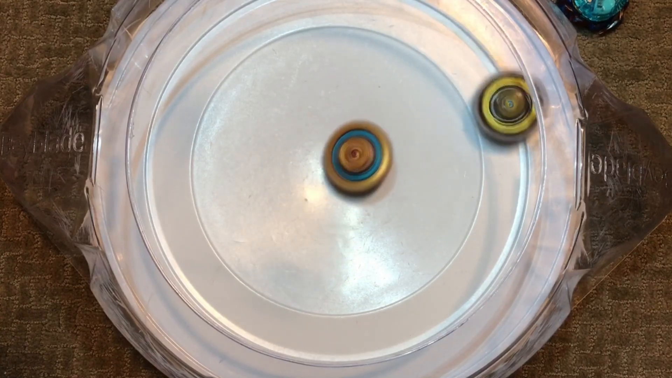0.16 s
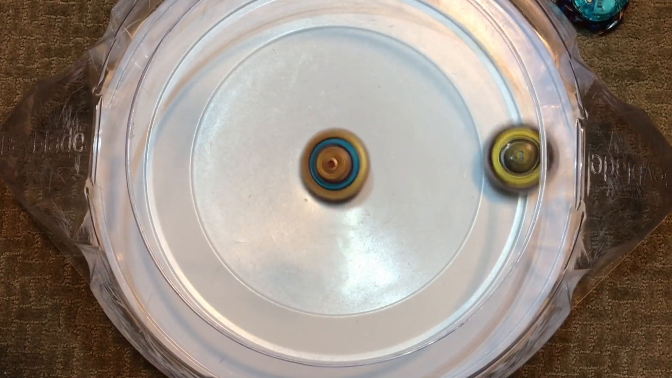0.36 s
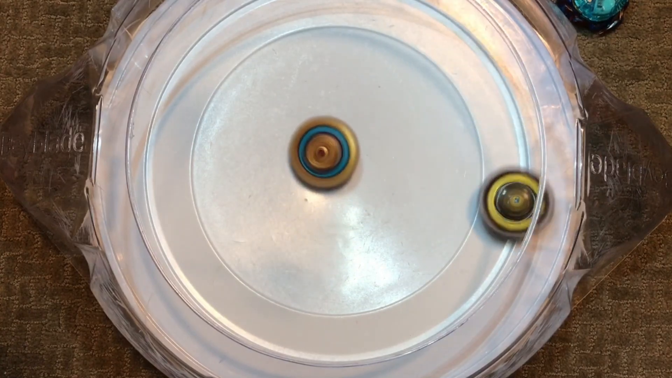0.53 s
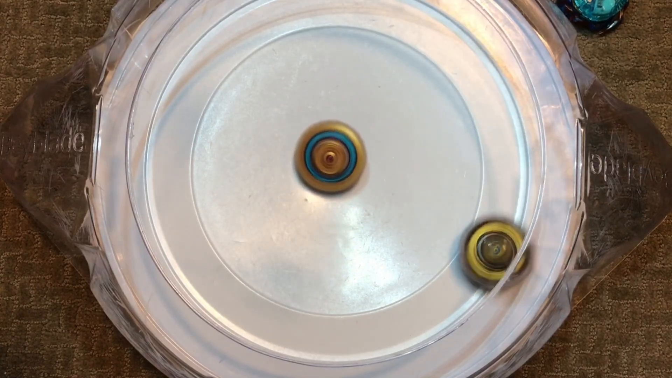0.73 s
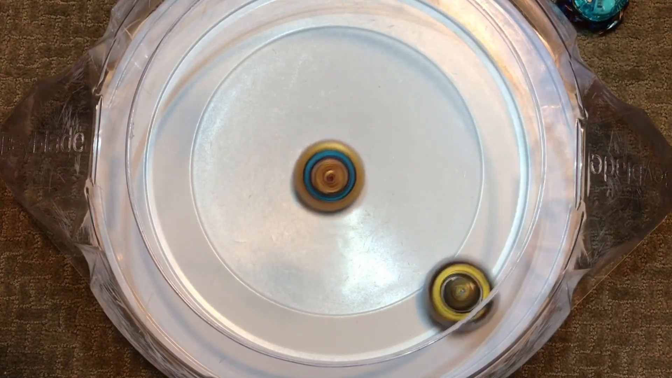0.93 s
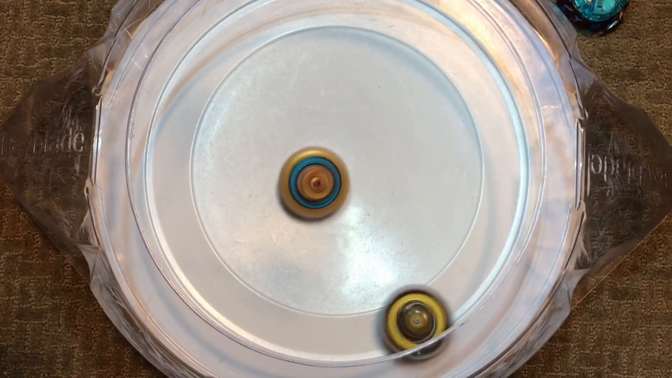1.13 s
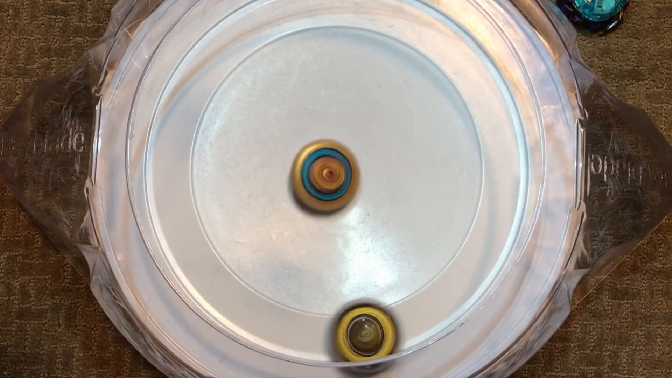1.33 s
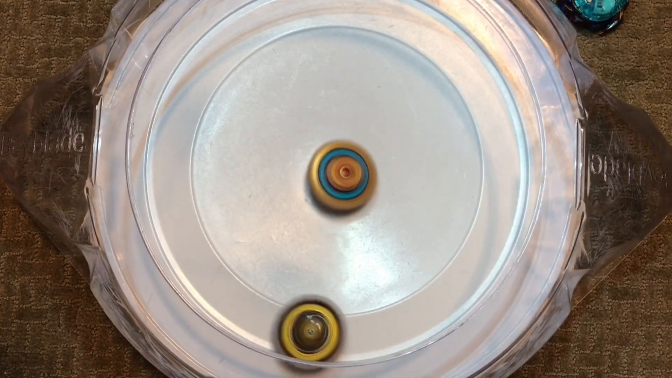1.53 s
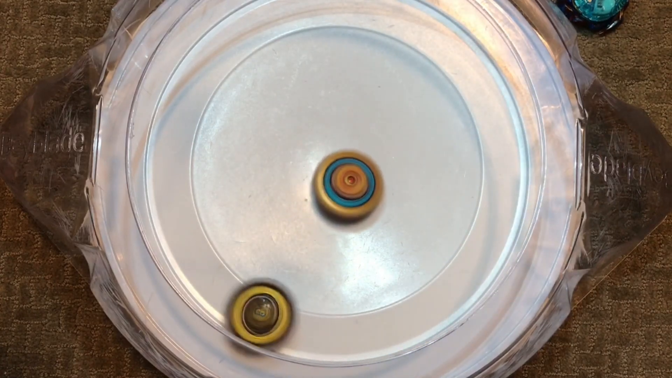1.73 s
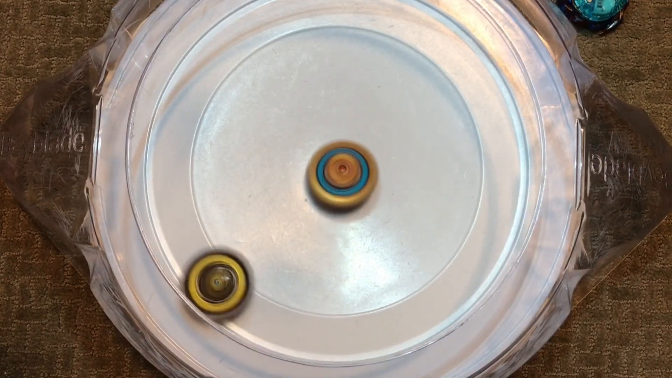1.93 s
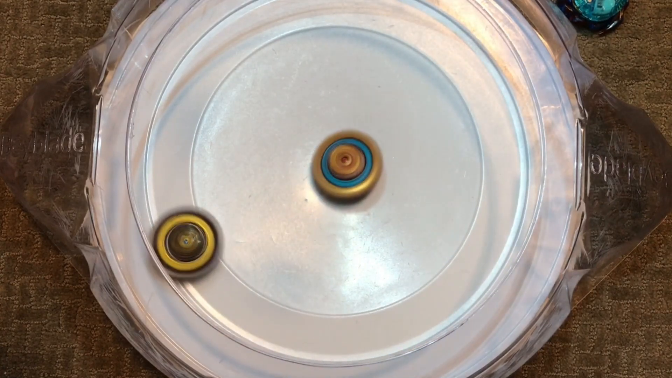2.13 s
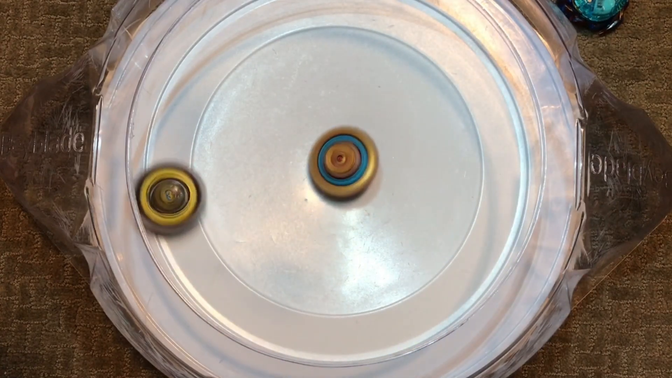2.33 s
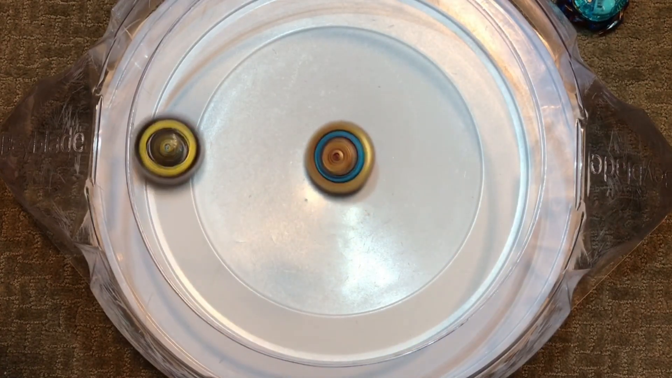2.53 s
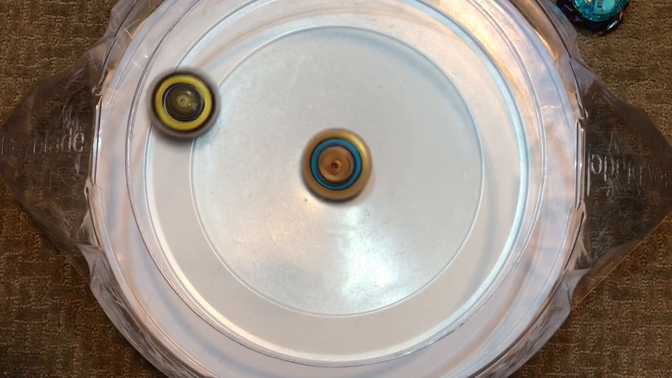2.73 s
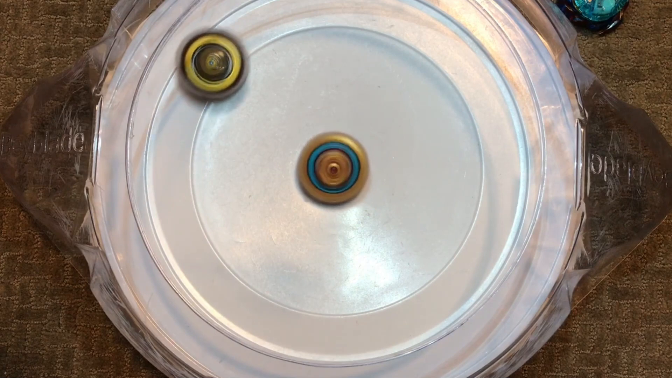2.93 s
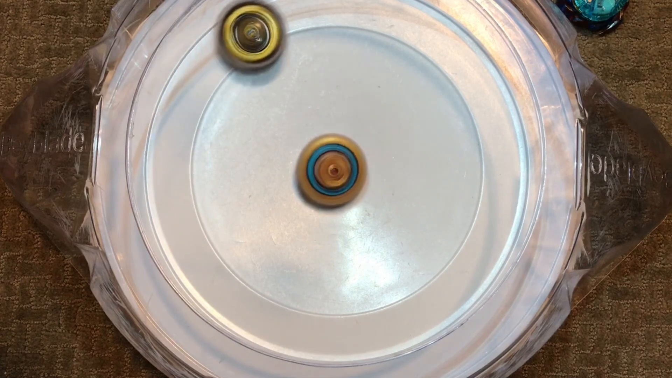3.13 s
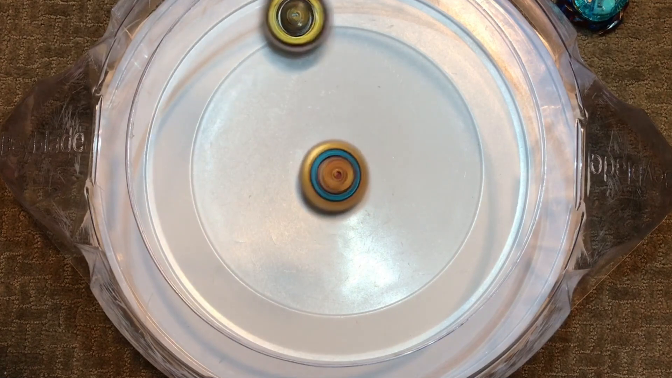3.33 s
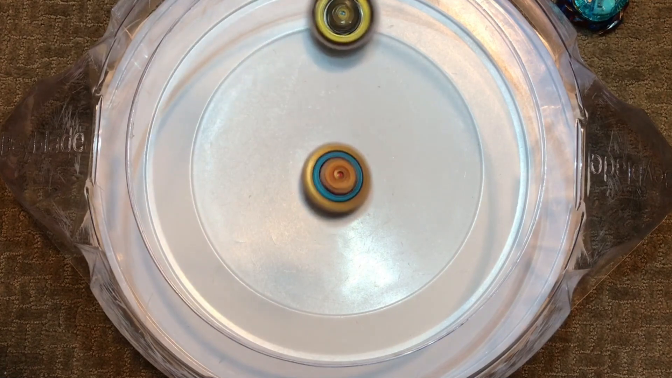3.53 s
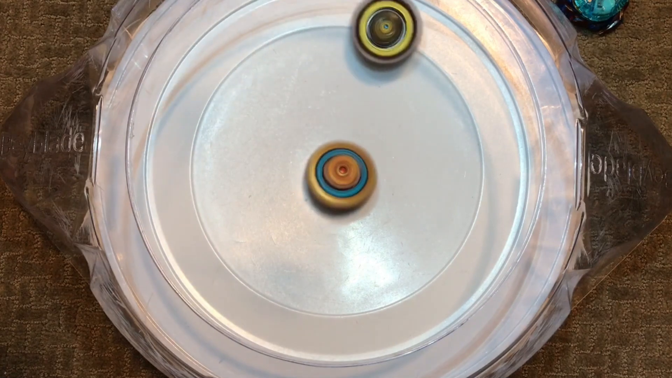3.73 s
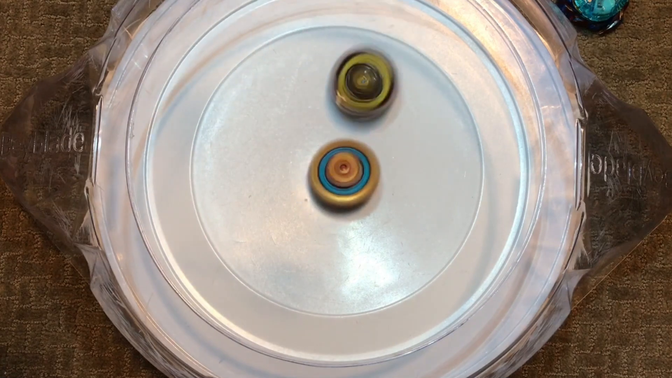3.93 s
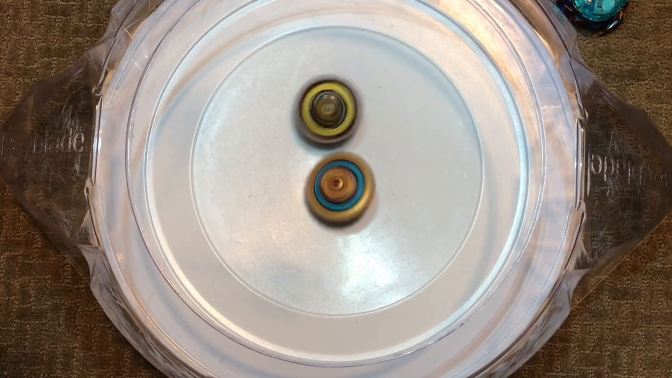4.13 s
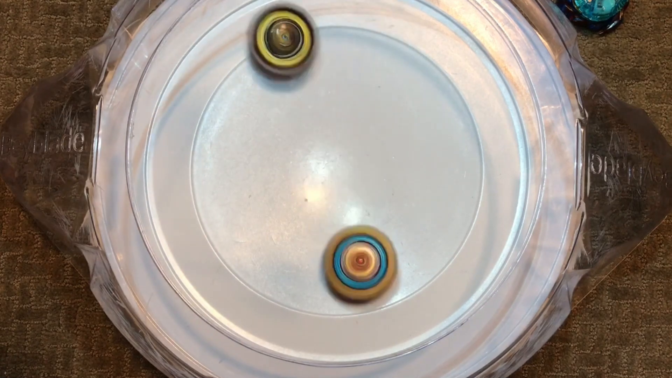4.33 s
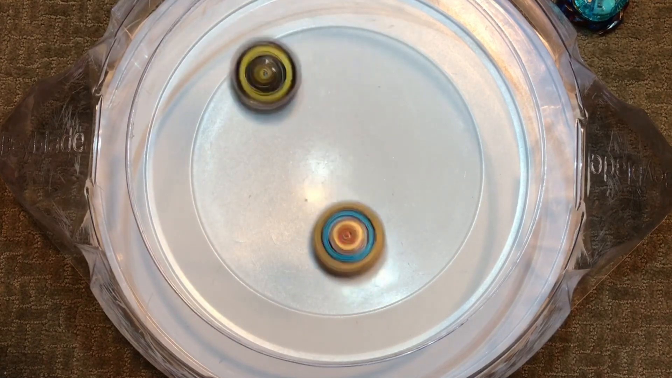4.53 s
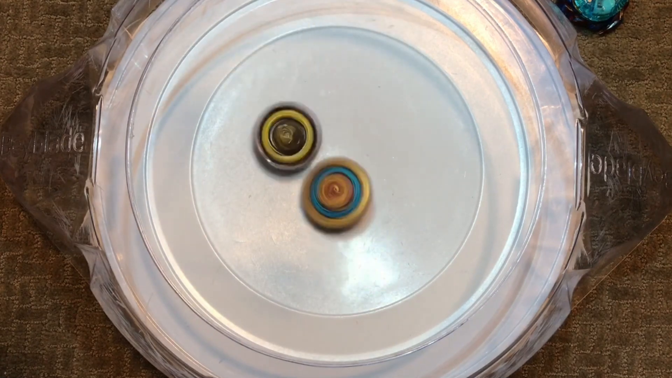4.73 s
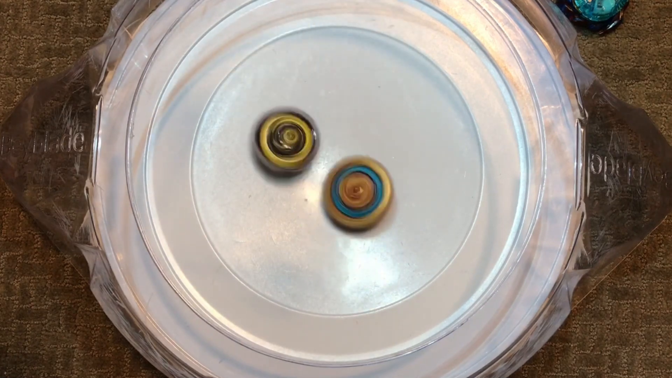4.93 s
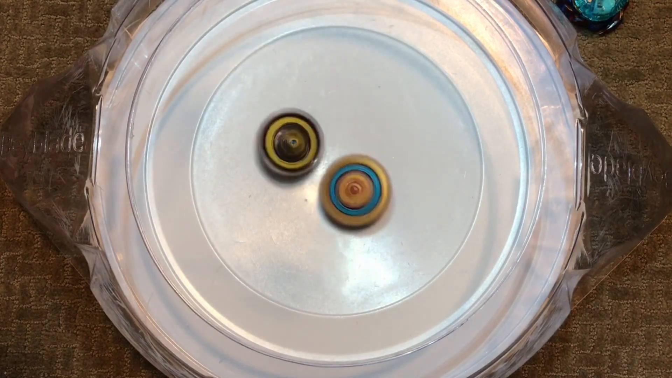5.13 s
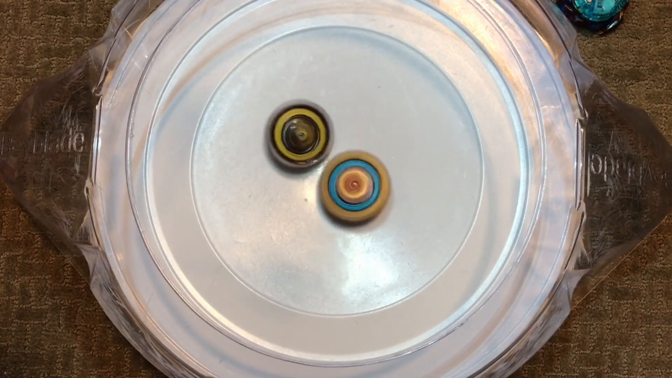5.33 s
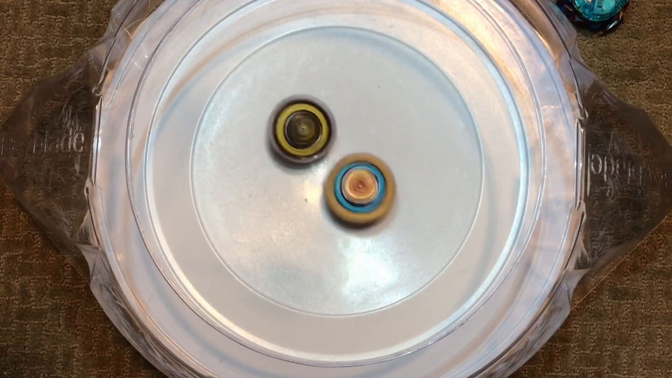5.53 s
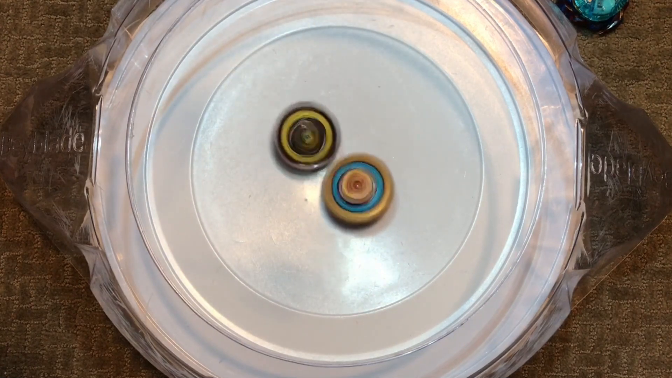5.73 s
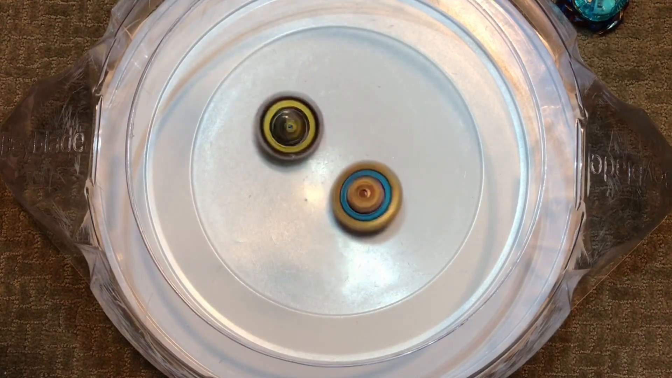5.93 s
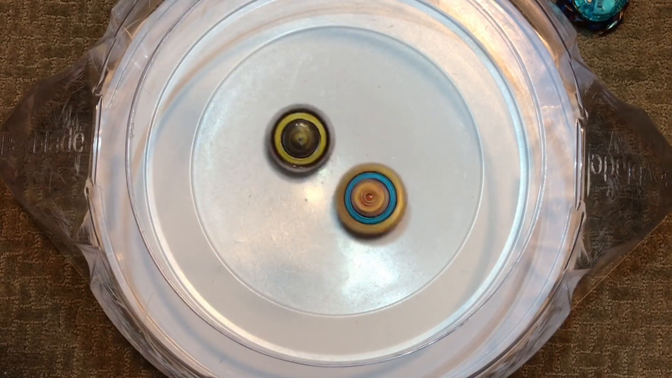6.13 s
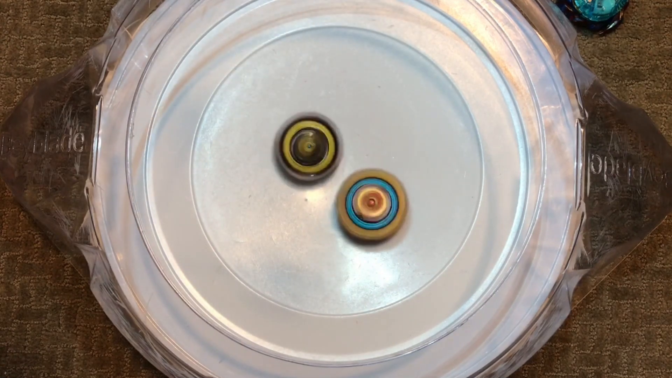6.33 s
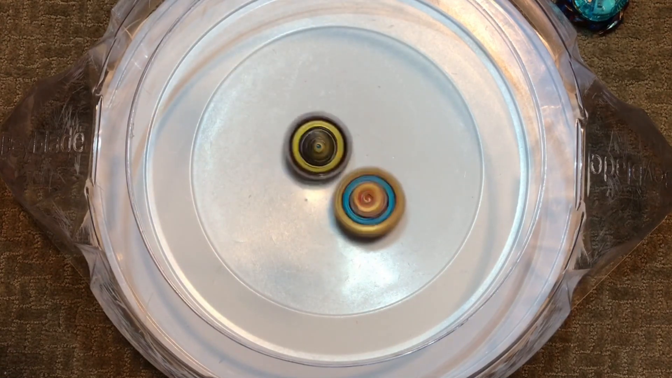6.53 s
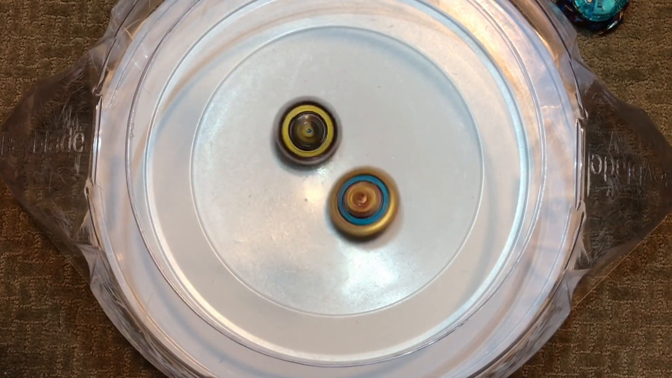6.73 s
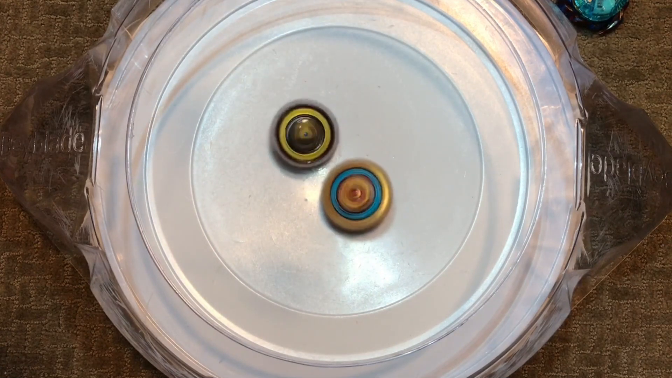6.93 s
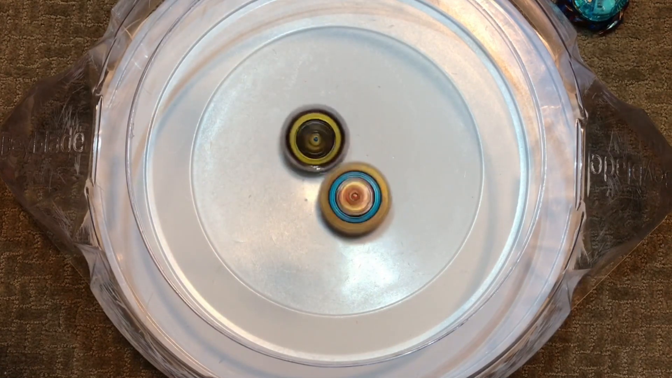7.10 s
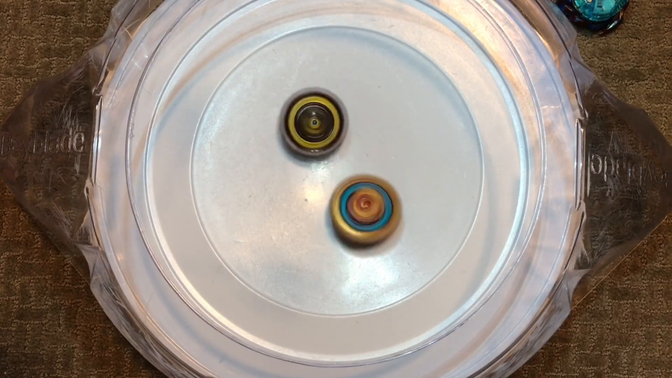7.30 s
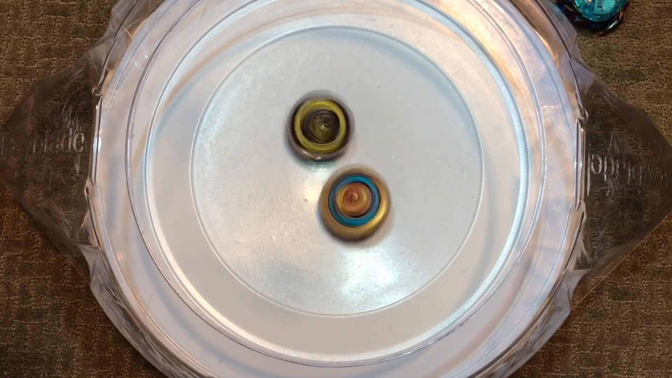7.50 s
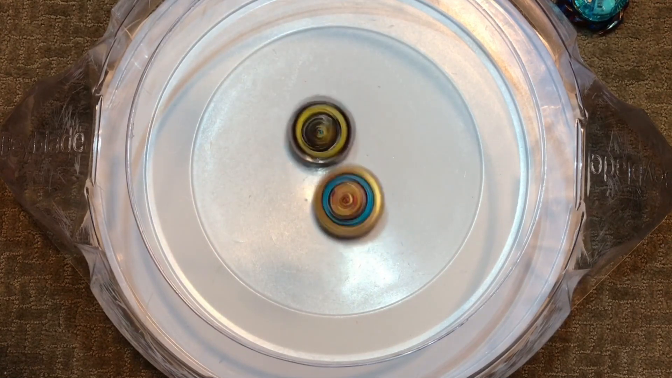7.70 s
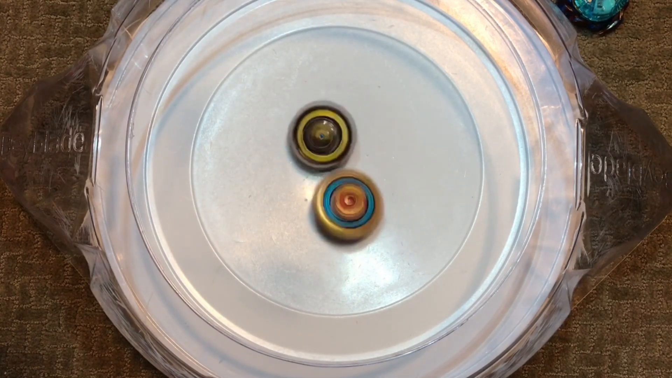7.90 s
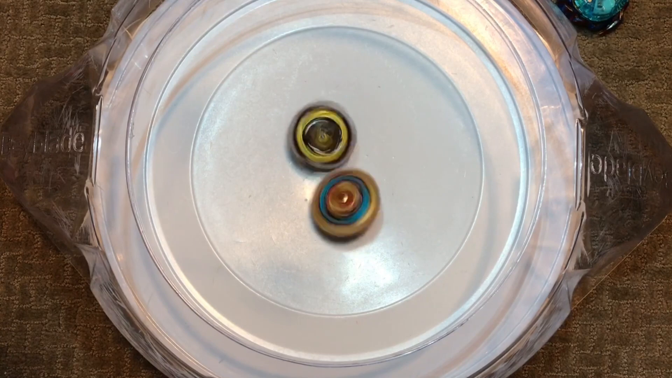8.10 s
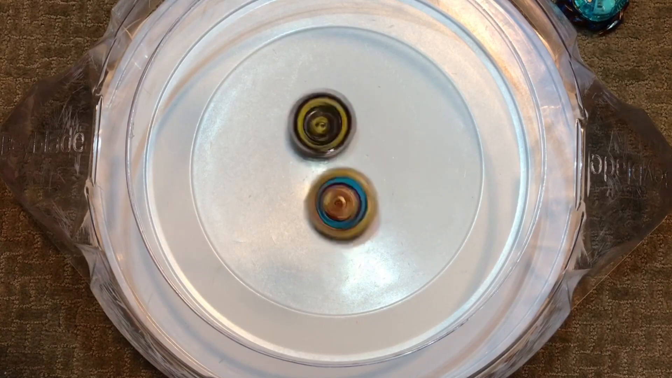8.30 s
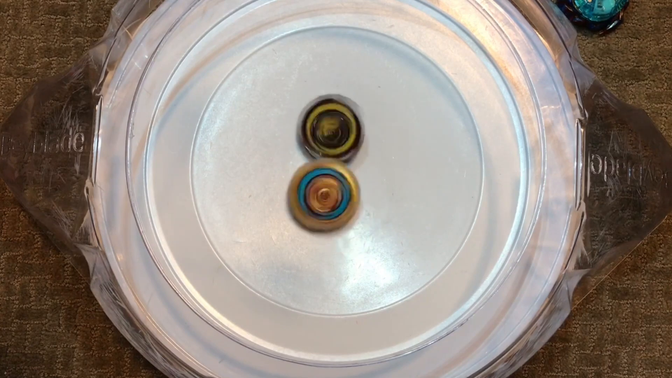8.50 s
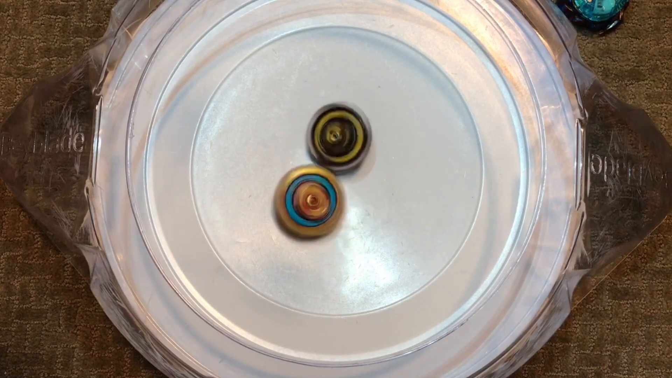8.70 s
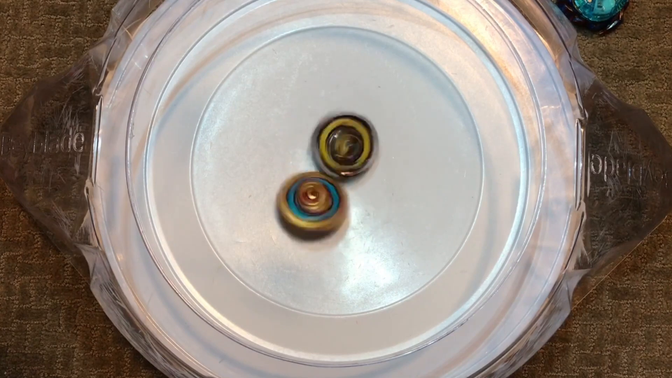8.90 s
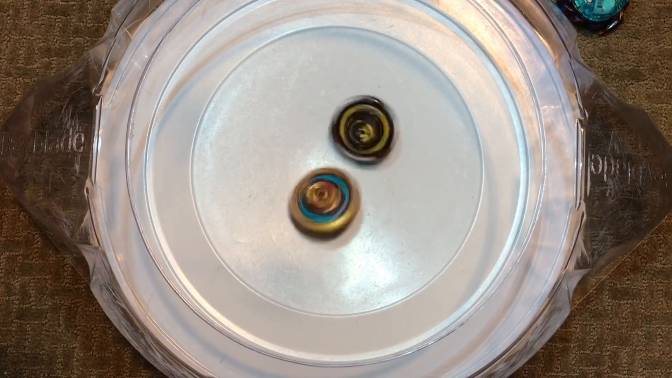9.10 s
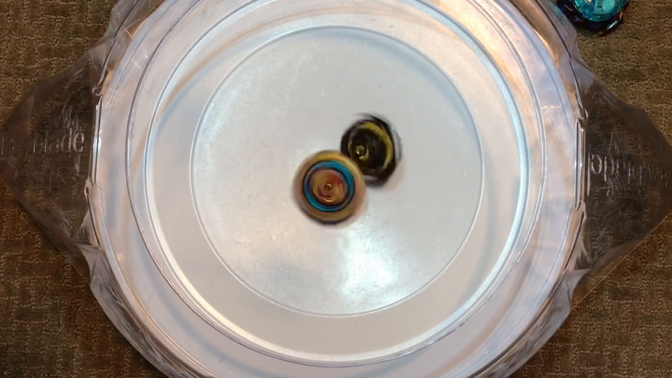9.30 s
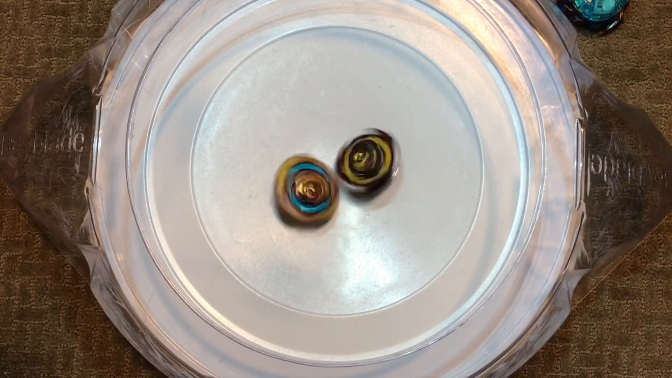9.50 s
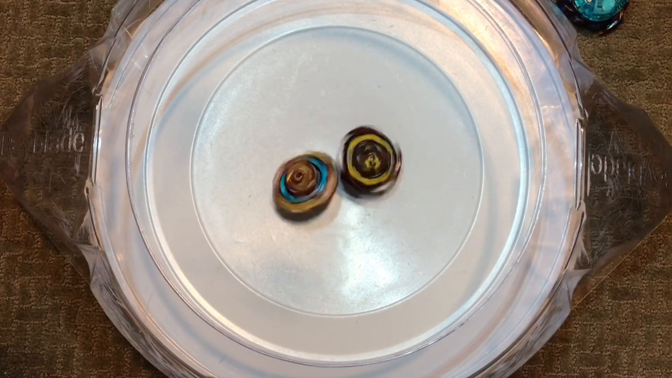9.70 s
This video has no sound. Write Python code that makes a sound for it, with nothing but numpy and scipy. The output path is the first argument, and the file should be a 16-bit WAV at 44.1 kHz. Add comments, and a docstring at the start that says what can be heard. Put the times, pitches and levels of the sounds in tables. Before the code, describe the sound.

A close microphone hears two spinning tops in a thin plastic bowl in a small room. From 0 to 4 seconds, one tip skitters around the rim: quick, light, uneven ticks, busiest in the first second and a half, with small low thumps and a soft, lumpy grinding rumble. Just after 4.0 the tops collide in a loud double crack with high metallic ringing; another sharp ringing hit comes at 4.2. Then mostly soft scraping until cracks at 4.8, 4.9 and 5.2, and separated strong hits near 5.8, 6.1, 6.3, 6.6 and 6.9. From 7 seconds the blows crowd into irregular clusters of hard clacks, dry rattles and hollow plastic knocks, denser after 8.4. From 9.2 to 9.7 heavy, deeper thumps tumble with the cracks while grinding swells. Echoes are short; quiet hiss lies beneath.

```python
"""A small room: two spinning tops with metal rings in a thin plastic bowl, a microphone above.
One tip first ticks along the rim; then the tops clash again and again. Both are shaped noise bursts.
Knocks send falling sine thumps through the bowl; the metal rings sing as wavering decaying sines.
The tips grind and scuff softly all along, as lumpy filtered noise; echo and quiet hiss lie behind."""
import sys
import numpy as np
from scipy import signal
from scipy.fft import rfft, irfft, next_fast_len
from scipy.io import wavfile
from scipy.ndimage import map_coordinates

SR = 44100
rng = np.random.default_rng(int(sys.argv[2]) if len(sys.argv) > 2 else 0)


def volts_from_decibels(level):
    """Turn decibel levels (scalar or array-like) into linear amplitude factors."""
    exponent = np.asarray(level, float) / 20
    return 10 ** exponent


def to_wav(s):
    """Save 16-bit WAV."""
    ch = np.atleast_2d(s).T  # columns
    pcm = np.round(np.clip(ch, -1, 1) * 32767)  # PCM
    wavfile.write(sys.argv[1], SR, pcm.astype(np.int16))


N = 429962


def along(points, hz):
    """Interpolates (Hz, value) points on a log frequency axis."""
    point_hz, value = np.transpose(points)
    return np.interp(np.log(hz + 1), np.log(point_hz + 1), value)


def unit(x):
    """Scales to rms 1."""
    return x / np.sqrt(np.mean(x ** 2) + 1e-20)


def coloured(x, spectrum):
    """Filters x through (Hz, dB) points; white noise keeps its rms."""
    size = next_fast_len(len(x) + 8192)
    gain = unit(volts_from_decibels(along(spectrum, np.fft.rfftfreq(size, 1 / SR))))
    return irfft(rfft(x, size) * gain, size)[:len(x)]


def add(track, start_s, sound):
    """Mixes a sound into the track at start_s."""
    track[max(round(start_s * SR), 0):][:len(sound)] += sound


def knocks(events, spectrum, head_t60_s, body_t60_s, body_db, uneven_db):
    """Noise bursts with a head and a weaker rattling body; each blow wakes the plastic unevenly."""
    track, t = np.zeros(N + SR), np.arange(8192) / SR
    hz = np.fft.rfftfreq(len(t), 1 / SR)
    colour = volts_from_decibels(along(spectrum, hz))
    treble = np.clip((hz - 4500) / 4000, 0, 1)
    for start_s, level_db, treble_db in events:
        # touches under -24 dB drag out: head up to 3x, attack up to 9x
        stretch = 1 + 2 * np.clip((-24 - level_db) / 14, 0, 1)
        head = volts_from_decibels(-60 * t / (head_t60_s * stretch))
        body = volts_from_decibels(body_db - 60 * t / body_t60_s)
        attack = 1 - np.exp(-t / (0.00049 * stretch ** 2))
        shape = (head + body) * attack
        # parts rattle as they part; the burst keeps its energy
        chatter = volts_from_decibels(2.44 * map_coordinates(rng.standard_normal(128), [t * 400]))
        chatter *= np.linalg.norm(shape) / np.linalg.norm(shape * chatter)
        uneven = volts_from_decibels(uneven_db * map_coordinates(rng.standard_normal(64), [hz / 450]))
        gain = unit(colour * uneven) * volts_from_decibels(treble_db * treble)
        blow = irfft(rfft(rng.standard_normal(len(t))) * gain)
        add(track, start_s, volts_from_decibels(level_db) * shape * chatter * blow)
    return track[:N]


# tops striking each other: start_s, crack_db, treble_db (extra), thump_db, final_pitch_hz
CLASH_EVENTS = [(4.0223, -19.5, -7, -43, 110), (4.0313, -5, -2.5, -15, 243), (4.0429, -8, 2.5, -13.5, 114),
                (4.076, -27, -8.5, -12, 216), (4.1262, -31, -5.5, -20, 65), (4.2184, -6, 0.5, -20, 65),
                (4.3017, -35, -5.5, -35, 65), (4.6251, -42.5, -16, -44, 90), (4.7646, -8.5, 1, -12, 172),
                (4.7953, -23, -16, -22, 114), (4.8337, -22.5, -14.5, -24, 63.7),
                (4.8572, -34, -12, -25, 80), (4.9386, -7.5, 1.5, -15, 82), (4.978, -33, -20, -19, 64.3),
                (5.0141, -28, -13, -28, 65.5), (5.1586, -34, -14, -40, 65), (5.2105, -7.5, -7, -11, 112),
                (5.3991, -20, -2.5, -22.5, 90.5), (5.4232, -14, -7, -15.5, 114),
                (5.4781, -31.5, -15, -28.5, 90), (5.538, -17.5, -11, -34, 90),
                (5.5495, -10, 1.5, -15.5, 65), (5.778, -4.5, -1.5, -13.5, 104),
                (6.089, -37, -8, -33, 110.6), (6.1089, -9.5, -1, -9, 206), (6.2924, -6.5, -1, -9, 231),
                (6.4513, -11.5, -5, -11.5, 108), (6.5, -30, -8.5, -30, 80), (6.5956, -19, -2, -15, 172),
                (6.6058, -10, -2, -8.5, 209), (6.8718, -5, 0.5, -4.5, 201), (7.0294, -12.5, -5.5, -15, 145),
                (7.0373, -18.5, -5, -38, 110), (7.0508, -23, -15, -28, 66), (7.1292, -35, -25, -48, 110),
                (7.1446, -14, -9, -16, 142), (7.1724, -12.5, 6.5, -17, 108), (7.3344, -50.5, -19, -48, 90),
                (7.4054, -45, -19, -46, 90), (7.481, -16.5, -8.5, -35, 80), (7.4859, -15, -7.5, -16, 81),
                (7.505, -20, -22.5, -33, 80), (7.517, -8.5, -6, -16, 86), (7.5652, -27, -21, -31, 80),
                (7.7004, -53, -14, -41, 90), (7.7613, -11, -10.5, -15.5, 107),
                (7.7762, -4.5, -7, -11.5, 93.5), (7.7936, -18.5, -1, -14, 65), (7.864, -34, -24, -33, 65),
                (7.9067, -15.5, -4.5, -21, 80), (7.9606, -11.5, -6, -20, 150), (7.981, -20.5, -3, -11, 111),
                (8.0033, -21.5, -9, -32, 80), (8.0976, -40, -10, -36, 80), (8.1412, -11, 0, -18, 82.5),
                (8.3033, -38.5, -10.5, -45, 90), (8.379, -36, -5, -27.5, 80),
                (8.414, -9.5, -6.5, -11.5, 159), (8.4276, -13.5, -11, -33, 80),
                (8.5311, -16.5, -1.5, -18, 92), (8.64, -19.5, -4.5, -20, 80), (8.6494, -26, -14, -29, 79),
                (8.6625, -13.5, -11, -29, 80), (8.676, -20, -10, -15, 66.5), (8.7017, -24, -4, -39, 65),
                (8.7664, -13, -8.5, -16.5, 80), (8.7777, -17, -10, -26, 80), (8.8306, -4.5, -6.5, -13, 198),
                (8.8335, -29.5, 6, -25, 110), (8.8458, -15, -27, -39, 80), (8.8667, -6.5, -4.5, -19, 110),
                (8.8774, -13, -17, -18, 110), (8.9311, -12, -1, -18, 151), (8.9688, -10, -3.5, -8.5, 143),
                (8.985, -19.5, -6, -19, 62), (9.095, -33.5, -5.5, -36, 90), (9.1202, -41, -13, -36, 90),
                (9.1617, -43, -19, -22, 64), (9.1778, -36, -24, -41, 90), (9.2092, -22.5, -7, -32, 110),
                (9.218, -8, -1.5, -24, 145), (9.2276, -15, -6.5, -1, 139), (9.2499, -14.5, -7, -29, 233),
                (9.309, -12.5, -8.5, -2.5, 177), (9.323, -28, -2, -24, 298), (9.344, -13, -5, 0.5, 234),
                (9.3698, -11, 0, -4, 192), (9.4919, -32, -22, -16.5, 192), (9.5227, -11.5, -7.5, 1.5, 245),
                (9.5468, -21, -2, -34, 200), (9.561, -31, 0, -21, 129), (9.5756, -20.5, -3.5, -12.5, 177),
                (9.624, -14, -5.5, -10, 303), (9.644, -12.5, -10, -5, 184), (9.6952, -22, -10, -7, 187),
                (9.7387, -27, -5, -32, 110)]
# crack spectrum: freq_hz, density_db (per Hz)
CRACK_SPECTRUM = [(400, -6.5), (700, -16.5), (1150, -10), (1860, -14), (2560, -7), (3200, -10.5),
                  (4060, -4.5), (5200, -9), (7000, -8), (8600, -6), (11900, -12.5), (14700, -4),
                  (16500, -10)]


def clashes():
    """Hard top-on-top cracks: short noise head, long weak rattling body."""
    return knocks([row[:3] for row in CLASH_EVENTS], CRACK_SPECTRUM,
                  head_t60_s=0.034, body_t60_s=0.14, body_db=-21.5, uneven_db=1.43)


# tip hopping on the rim: start_s, tick_db, treble_db (extra), thump_db
HOP_EVENTS = [(0.0161, -30, -13, -14.5), (0.0561, -29, 3.5, -17), (0.08, -28, -6, -14),
              (0.0967, -36, -9, -30), (0.1398, -51, 16, -23), (0.1678, -30, -3, -23.5),
              (0.201, -38, -12, -31), (.265, -35, -10, -31), (.2979, -34, -3, -25), (0.332, -30, -1, -19),
              (0.3674, -30.5, 0, -29), (0.3954, -31, 3, -19), (0.4196, -30, -18, -24), (0.434, -35, 1, -36),
              (0.4606, -27, 1, -15), (0.4857, -40, -6, -37), (0.5265, -26.5, -8, -12.5),
              (0.5492, -33, 5, -32), (0.592, -26.5, -4, -13.5), (0.6188, -30.5, 4, -16),
              (0.6555, -23, 3.5, -15), (0.6845, -32, -3, -20.5), (0.7167, -32, -1.5, -23),
              (0.7815, -36.5, -1, -32), (0.8162, -33, 4.5, -25), (0.8565, -30, -1, -31),
              (.8925, -29, -4.5, -29), (0.922, -30, -10, -23), (0.954, -28, -4.5, -22.5),
              (0.986, -32.5, -9, -18), (1.022, -32.5, -7, -25), (1.0521, -37, -14, -23),
              (1.121, -35.5, -4, -29), (1.1839, -29, 4.5, -20.5), (1.2504, -31.5, 6, -21.5),
              (1.3143, -38, -21, -33), (1.3593, -33.5, -20, -32), (1.3892, -35, -13, -28),
              (1.424, -35, -17, -27.5), (1.461, -32.5, -14, -24.5), (1.4953, -33, -8, -24),
              (1.529, -32.5, -5, -23.5), (1.5623, -34, -9, -27), (1.599, -35.5, -11, -28),
              (1.669, -36.5, -5, -31), (1.731, -33, -1, -20), (1.7579, -33, -1, -29),
              (1.8025, -25, 0.5, -18), (1.832, -30.5, -9, -25), (1.868, -35, -10, -32),
              (1.9036, -35, -4, -26), (1.985, -31.5, -7, -31), (2.051, -33, -4, -20.5),
              (2.1207, -28.5, -13, -14.5), (2.1462, -36, -6, -24), (2.1924, -32, 2, -14.5),
              (2.215, -32.5, 3, -25), (2.261, -36, -2, -19.5), (2.3416, -30, 3, -19),
              (2.406, -31.5, -4, -16), (2.4325, -28, 0.5, -22), (2.4773, -36, -5, -17),
              (2.55, -38, -15, -21), (2.594, -37.5, -14, -41), (2.621, -36.5, -4, -22.5),
              (2.6921, -35, 1, -27), (2.7705, -33.5, 0, -21), (2.8445, -34.5, 1, -21),
              (2.919, -34.5, -7, -20), (2.993, -32, -10, -21), (3.0691, -29.5, 0.5, -20.5),
              (3.1424, -33, 0, -23.5), (3.219, -32.5, -3, -25), (3.227, -33, -2, -29),
              (3.2955, -29.5, 0.5, -21.5), (3.3041, -28.5, -11, -41), (3.3177, -34, -9, -31),
              (3.3712, -29.5, 1, -21), (3.449, -29.5, 1, -21), (3.52, -36, -15, -37),
              (3.6003, -29.5, 0, -25.5), (3.68, -32, -11, -23.5), (3.7583, -32, 1.5, -23),
              (3.7682, -31, -5, -31), (3.8302, -34, -8, -24), (3.843, -31.5, -3, -21.5),
              (3.865, -33.5, 2, -38), (3.9155, -33.5, -1.5, -23.5), (3.9912, -36.5, -2, -35)]
# tick spectrum: freq_hz, density_db (per Hz)
TICK_SPECTRUM = [(400, -15), (700, -4), (1150, 0.5), (1800, 0), (2550, 2.5), (3500, -0.5), (5200, -3.5),
                 (7000, 1), (9500, -0.5), (13000, -8), (15000, -1.5), (16500, -15)]


def hops():
    """Light tip-on-rim ticks: brief noise bursts with a short body."""
    return knocks([row[:3] for row in HOP_EVENTS], TICK_SPECTRUM,
                  head_t60_s=0.012, body_t60_s=0.037, body_db=-2.5, uneven_db=2.5)


RIM_HZ, THUMP_LAG_S = 67, 0.00182  # final pitch under a hop; thump trails its knock
# a knocked top lands again
LAND_DELAY_S, LAND_LOSS_DB, LAND_MAX_DB, LAND_HZ = 0.019, 9, -22, 69.7


def thumps():
    """Bending waves in thin plastic carry the highs faster, so each thump falls in pitch."""
    track, t = np.zeros(N + SR), np.arange(SR // 10) / SR
    blows = [(start_s, db, RIM_HZ) for start_s, _, _, db in HOP_EVENTS]
    for start_s, _, _, db, hz in CLASH_EVENTS:
        blows.append((start_s, db, hz))
        blows.append((start_s + LAND_DELAY_S, min(db - LAND_LOSS_DB, LAND_MAX_DB), LAND_HZ))
    for start_s, db, hz in blows:
        cycles = hz * t + 0.9 * (1 - np.exp(-t / 0.004))
        rise = 1 - np.exp(-t / (0.00032 * hz / 65))  # higher knocks build up more slowly
        decay = np.exp(-t * hz / 0.71)
        add(track, start_s + THUMP_LAG_S, volts_from_decibels(db) * np.sin(2 * np.pi * cycles) * decay * rise)
    return track[:N]


# blows that set one ring family singing: start_s, family_hz (picks the nearest family), ring_db
RING_STRIKES = [(4.03, 11040, -40), (4.031, 14900, -18), (4.218, 5930, -27), (4.216, 13300, -14),
                (4.217, 11040, -37), (4.216, 14900, -17), (4.766, 13300, -15), (4.764, 14900, -31),
                (4.937, 5380, -38), (4.938, 13300, -22.5), (4.941, 5930, -43), (5.212, 5930, -43),
                (5.21, 14900, -36), (5.397, 14900, -42), (5.552, 11040, -42), (5.552, 14900, -45),
                (5.779, 5930, -40.5), (5.779, 11040, -44), (5.779, 14900, -23.5), (6.107, 11040, -37.5),
                (6.109, 14900, -36), (6.293, 14900, -39), (6.452, 11040, -41), (6.607, 11040, -49),
                (6.607, 14900, -37), (6.874, 5380, -45), (6.873, 5930, -45), (6.872, 11040, -30),
                (6.874, 14900, -22), (7.027, 11040, -43), (7.028, 14900, -29), (7.176, 5930, -39),
                (7.175, 13300, -18.5), (7.516, 5380, -47), (7.517, 11040, -45), (7.517, 14900, -32),
                (7.908, 5930, -43), (7.906, 11040, -34), (7.96, 11040, -41), (8.145, 14900, -30),
                (8.411, 5380, -42), (8.413, 11040, -36), (8.413, 14900, -28), (8.835, 14900, -23),
                (8.97, 5930, -37), (8.969, 14900, -39), (9.224, 5930, -38), (9.369, 5380, -33),
                (9.369, 13300, -24), (9.37, 14900, -35), (9.625, 14900, -34)]
# metal ring modes, one family a line: mode_hz, level_db, t60_s
RING_FAMILIES = [
    [(5330, 0, .22), (5425, -1, .24)],
    [(5900, 0, .33), (5965, -1, .29)],
    [(8640, 2, .1), (13235, -6, .1), (13320, 1, .11), (13600, 0, .11)],
    [(8362, -1, .19), (11005, -2, .18), (11068, 0, .2)],
    [(14485, -2, .14), (14560, -1, .14), (15000, -2, .13), (15090, -2, .13), (15170, 2, .07),
     (15450, -4, .07)],
]
HARD_DB = -18  # clashes above this ring every family faintly
FAINT_DB, FAINT_SPREAD_DB = -41, 5  # relative to the crack


def rings():
    """The struck spot picks a mode family, some split into close pairs by spin; wobble makes it waver."""
    track, t = np.zeros(N + SR), np.arange(SR // 3) / SR

    def nearest(hz):
        return min(RING_FAMILIES, key=lambda family: min(abs(mode[0] - hz) for mode in family))

    blows = [(start_s, db, nearest(hz)) for start_s, hz, db in RING_STRIKES]
    for start_s, crack_db, *_ in CLASH_EVENTS:
        if crack_db > HARD_DB:
            for family in RING_FAMILIES:
                faint_db = crack_db + FAINT_DB + FAINT_SPREAD_DB * rng.standard_normal()
                blows.append((start_s, faint_db, family))
    for start_s, ring_db, family in blows:
        for hz, level_db, t60_s in family:
            waver_db = 4.5 * map_coordinates(rng.standard_normal(32), [t * 55])
            decay = volts_from_decibels(ring_db + level_db + waver_db - 60 * t / t60_s)
            attack = 1 - np.exp(-t / 0.002)
            drift_rad = 0.031 * np.cumsum(rng.standard_normal(len(t)))
            tone = np.sin(2 * np.pi * (hz * t + rng.random()) + drift_rad)
            add(track, start_s, decay * attack * tone)
    return track[:N]


# tip pressure on the plastic: time_s, rumble_db
GRIND_LEVEL = [(0.0, -34), (1.54, -40.5), (2.41, -38.5), (2.71, -39.5), (3.99, -40), (4.4, -47),
               (4.72, -43), (4.91, -37), (5.19, -45.5), (5.89, -51), (7.03, -46.5), (7.5, -53.5),
               (7.76, -49), (7.93, -51.5), (8.36, -44.5), (8.8, -42.5), (9.09, -41), (9.75, -30.5)]
MEET_S = 4.03  # rim shakes freely; from here both tips run on the stiffer middle
SCRATCH_RIM_DB, SCRATCH_MIDDLE_DB = -14.5, -10  # relative to rumble


def pressure(t):
    """Rumble and scratch levels in dB at times t."""
    rumble_db = np.interp(t, *np.transpose(GRIND_LEVEL))
    return rumble_db, rumble_db + np.where(t < MEET_S, SCRATCH_RIM_DB, SCRATCH_MIDDLE_DB)


# scuff spectrum: freq_hz, density_db (per Hz)
SCUFF_SPECTRUM = [(400, -27), (1200, -5), (2000, -4.5), (2600, 8.5), (3300, 1.5), (5000, -4), (7500, -3),
                  (12000, -19), (16500, -28)]
SCUFF_DB, SCUFF_SPREAD_DB = 10.5, 3.5  # relative to scratch
SCUFF_TREBLE_DB, SCUFF_TREBLE_SPREAD_DB = -5.5, 5.7


def scuffs(count):
    """Light touches at chance moments, short noise bursts following the grinding pressure."""
    chance = rng.standard_normal((count, 2))
    start_s = (np.arange(count) + rng.random(count)) * N / SR / count
    level_db = pressure(start_s)[1] + SCUFF_DB + SCUFF_SPREAD_DB * chance[:, 0]
    treble_db = SCUFF_TREBLE_DB + SCUFF_TREBLE_SPREAD_DB * chance[:, 1]
    return knocks(zip(start_s, level_db, treble_db), SCUFF_SPECTRUM,
                  head_t60_s=0.0073, body_t60_s=0.042, body_db=-12.5, uneven_db=4.0)


# bowl rumble spectrum: freq_hz, density_db (per Hz)
RUMBLE_SPECTRUM = [(18, -53.5), (30, 3.5), (114, 2), (236, -8.5), (265, -3.5), (301, -3.5), (442, -3),
                   (509, -16.5), (900, -46), (1170, -57), (1980, -120)]
# tip scratch spectrum: freq_hz, density_db (per Hz)
SCRATCH_SPECTRUM = [(350, -6), (600, 16), (885, 7.5), (1150, 12.5), (1720, 7), (1870, -4.5), (2570, 7),
                    (3040, 2), (4740, 1.5), (5910, -8.5), (8130, -2.5), (15200, -9), (16500, -45)]


def grind():
    """The tips catch on the plastic in small uneven lumps that shake the bowl and scratch."""
    t = np.arange(N) / SR
    rumble_db, scratch_db = pressure(t)
    catches = (rng.random(N) < 200 / SR) * volts_from_decibels(2.5 * rng.exponential(1, N))  # about 200 a second
    lumps = unit(signal.fftconvolve(catches, np.exp(-t[:SR // 20] / 0.0052))[:N])
    rumble = unit(coloured(rng.standard_normal(N) * (0.28 + lumps), RUMBLE_SPECTRUM))
    scratch = unit(coloured(rng.standard_normal(N) * (0.8 + lumps), SCRATCH_SPECTRUM))
    return volts_from_decibels(rumble_db) * rumble + volts_from_decibels(scratch_db) * scratch


# hollow plastic modes of bowl and tops: mode_hz, width_hz, level_db
SHELL_MODES = [(434, 177, 1.5), (1121, 130, -2), (1340, 41, -4.5), (2376, 147, -0.5), (2713, 350, -4.5),
               (3110, 32, 0), (3940, 110, -9)]


def shell(x):
    """Every blow also rings the hollow plastic: parallel second-order resonances."""
    size = next_fast_len(N + 8192)
    f = np.fft.rfftfreq(size, 1 / SR)
    response = 0
    for hz, width_hz, db in SHELL_MODES:
        damping = 1j * f * width_hz
        response = response + volts_from_decibels(db) * damping / (hz * hz - f * f + damping)
    return irfft(rfft(x, size) * response, size)[:N]


# bowl and room dying away: freq_hz, t60_s
TAIL_DECAY = [(100, 0.1), (400, 0.19), (800, 0.14), (1300, 0.34), (1800, 0.24), (2600, 0.16), (5000, 0.19),
              (13000, 0.08)]


def tail(x):
    """Noise echo, each frequency dying at its own speed; a new echo every fifth of a second."""
    wet, step = np.zeros(N + SR), SR // 5
    for start in range(0, N, step):
        hz, t, bins = signal.stft(rng.standard_normal(SR // 3), SR, nperseg=256)
        decay = volts_from_decibels(-60 * t / along(TAIL_DECAY, hz)[:, None])
        echo = signal.istft(bins * decay, SR, nperseg=256)[1]
        echo = echo / np.linalg.norm(echo)
        add(wet, start / SR + 0.004, signal.fftconvolve(x[start:start + step], echo))
    return wet[:N]


# steady background spectrum: freq_hz, density_db (per Hz)
HISS_SPECTRUM = [(300, -30.5), (1000, 0), (4000, 11), (10000, -29), (16000, 13)]


def hiss():
    """Steady quiet noise of room and microphone."""
    return volts_from_decibels(-76.0) * coloured(rng.standard_normal(N), HISS_SPECTRUM)


def scene():
    """Knocks with their echo, over grinding and hiss."""
    sharp = hops() + scuffs(count=400) + clashes()
    low, metal = thumps(), rings()
    sharp = sharp + shell(sharp)
    echo = tail(volts_from_decibels(-14.0) * sharp + volts_from_decibels(-7.5) * low + volts_from_decibels(-23.0) * metal)
    return (sharp + low + metal + echo + grind() + hiss())[None]


def roll_off(x):
    """The treble ends steeply here."""
    return signal.sosfilt(signal.butter(12, 16800, fs=SR, output="sos"), x)


TOP_HZ, BASS_HZ = 15450, 52  # microphone band


def record(dry):
    """Small microphone: soft ceiling, little deep bass, little above its band."""
    hz = np.fft.rfftfreq(N, 1 / SR)
    treble_cut = volts_from_decibels(-24 * np.clip((hz - TOP_HZ) / 250, 0, 1))
    bass_cut = 1 / np.sqrt(1 + (BASS_HZ / (hz + 1)) ** 8)
    held = dry / (1 + np.abs(dry) ** 6) ** (1 / 6)
    return roll_off(irfft(rfft(held) * treble_cut * bass_cut, N))


dry = scene()
out = record(dry)
to_wav(out)
```